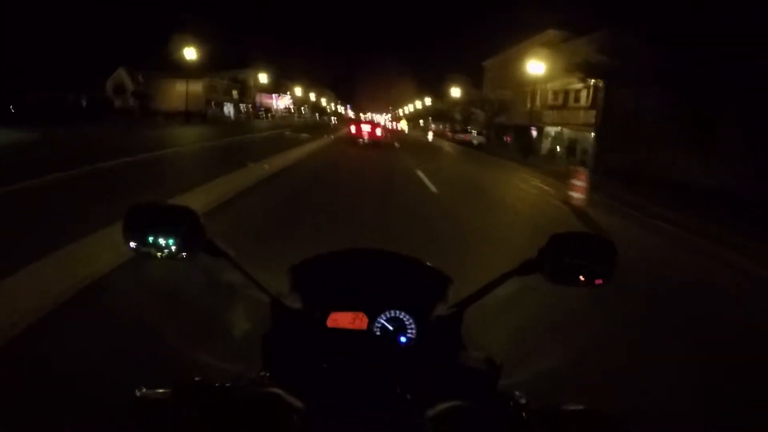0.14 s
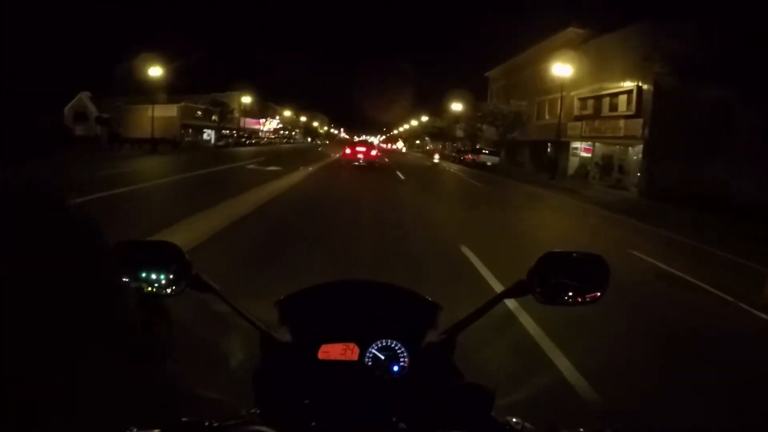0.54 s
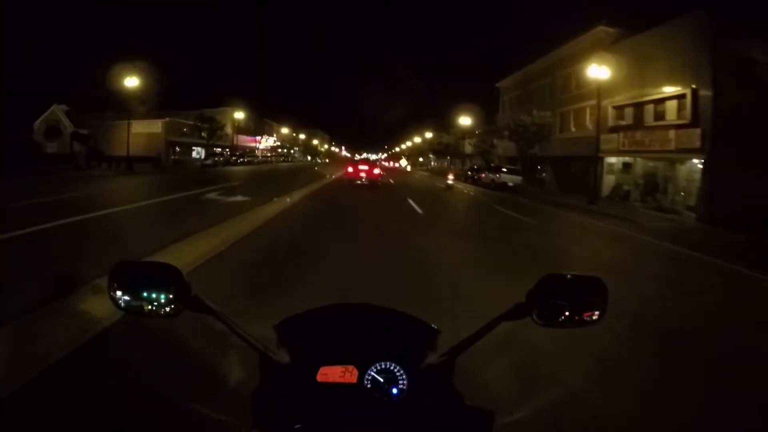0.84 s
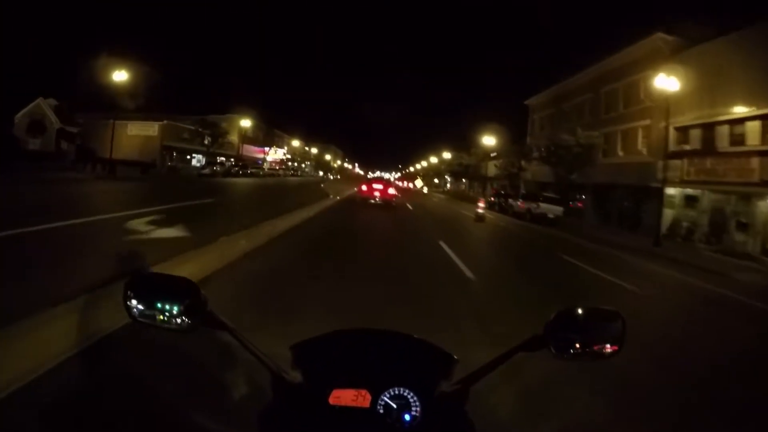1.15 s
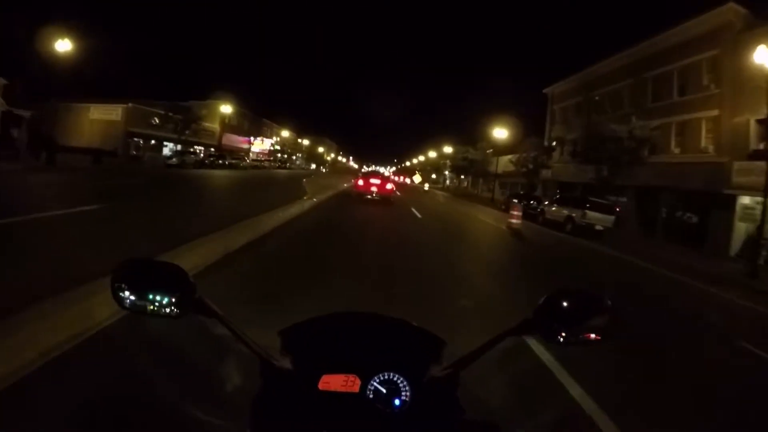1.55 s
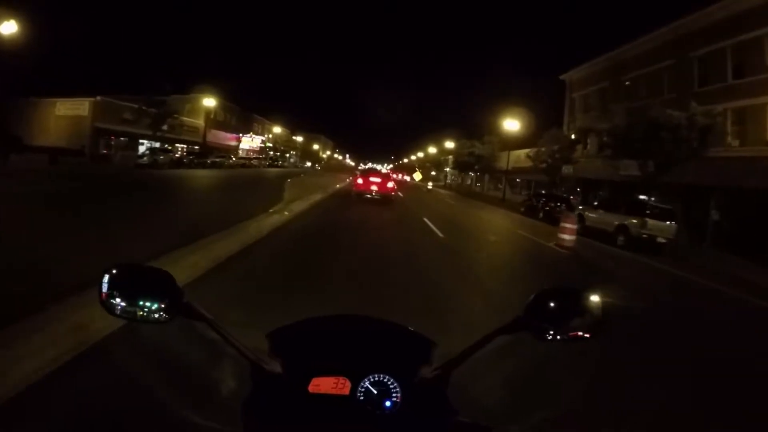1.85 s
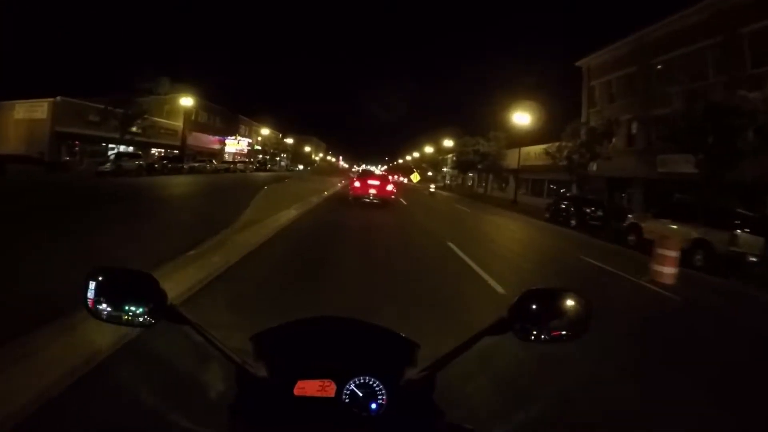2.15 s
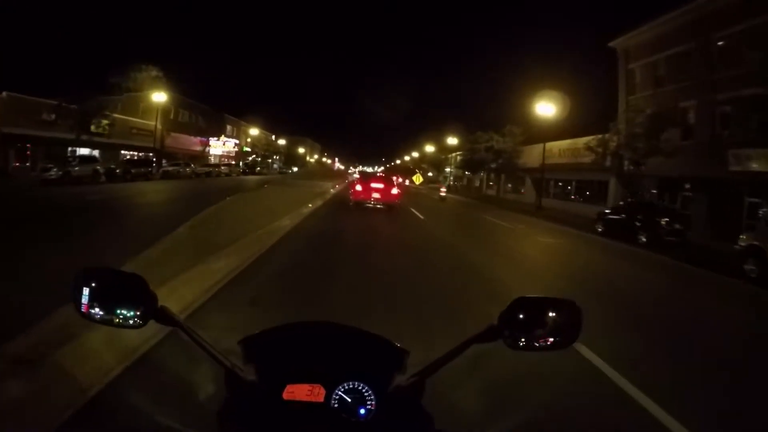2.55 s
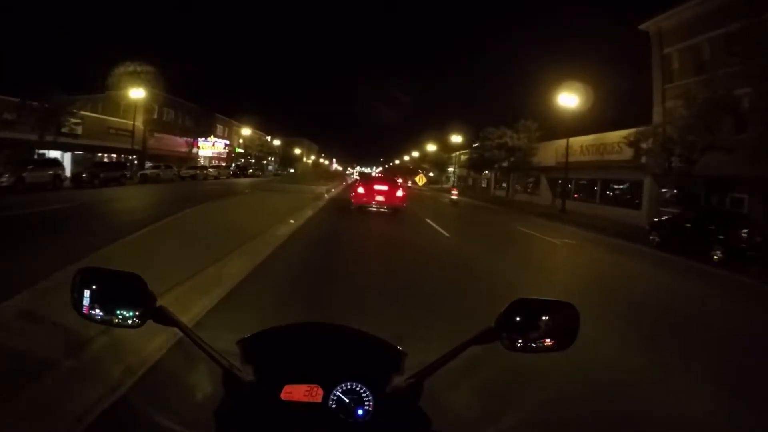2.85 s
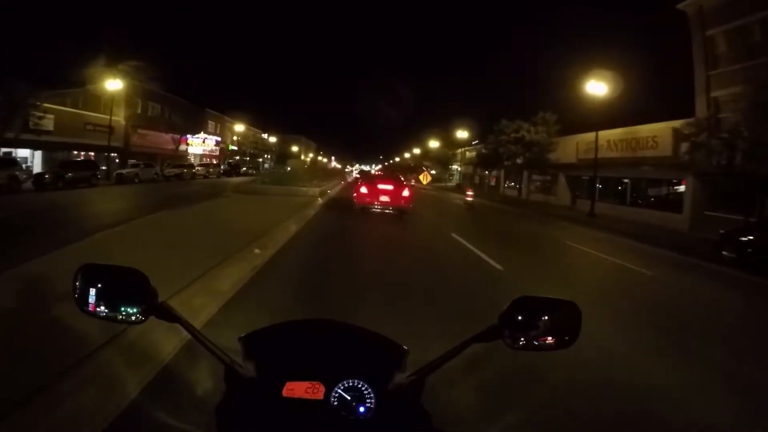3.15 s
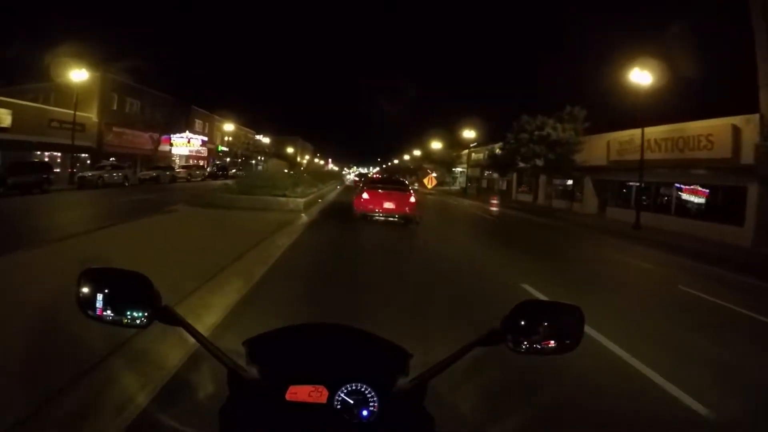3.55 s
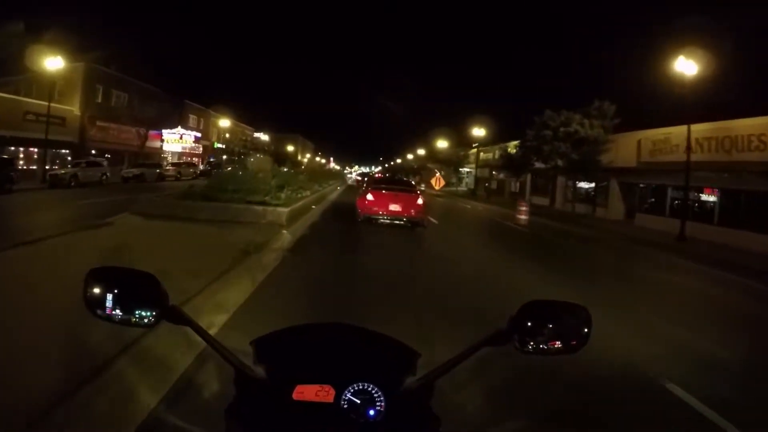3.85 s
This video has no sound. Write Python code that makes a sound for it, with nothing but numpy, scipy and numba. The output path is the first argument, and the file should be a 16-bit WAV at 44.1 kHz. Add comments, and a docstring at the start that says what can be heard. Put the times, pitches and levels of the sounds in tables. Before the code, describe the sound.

A motorcycle engine drones low beneath muffled wind and tyre roar, picked up close inside a camera case. At 0.05-0.35 s a hard bump booms and rattles the case; the level ducks, then gradually recovers. A faint hum passes around 0.6-1.6 s amid deep wobbling thumps and tiny hisses. The engine blips at 1.6 and 1.9 s, then sinks lower with a thin whine from 2.1-3.4 s; a soft thud lands at 3.54 s.

```python
"""A motorcycle rolls down a street at night, heard by a small camera in a closed case on the rider.
Wind and tyre roar pass muffled through the case, made from bands of noise, beside an engine of stacked tones.
At once a hard bump swings the mount and rattles the case; the gain control ducks and slowly comes back.
A hum swells up and fades, brief hisses come by, and the engine is blipped twice and then runs down.
A thin gear whine comes and goes over the slowing engine, and near the end one soft thud hits the case."""
import sys
import numpy as np
from scipy import signal
from scipy.io import wavfile
from numba import njit

SR = 44100
rng = np.random.default_rng(int(sys.argv[2]) if len(sys.argv) > 2 else 0)


def ratio(d):
    """dB to gain"""
    e = np.asarray(d, float) / 20
    return 10 ** e


def unload_audio(sound):
    """Save the sound as a 16-bit wav file, at the path given as the first command line argument."""
    columns = np.transpose(np.atleast_2d(sound))
    # keep every value between -1 and 1, then stretch to whole-number steps
    steps = np.round(np.clip(columns, -1, 1) * 32767)
    wavfile.write(sys.argv[1], SR, steps.astype(np.int16))


N = 176400
TIME_S = np.arange(N) / SR

# How the engine runs: time_s, firing_hz, level_db, throttle (0 closed, about 1 open)
ENGINE_RUN = [(0, 100.5, -24, 0.2), (.3, 98.43, -33, 1.02), (.71, 98.5, -34, 1), (1.2, 94.9, -24.5, 0.02),
              (1.5, 90.35, -22, 0), (1.54, 99.3, -17.5, 0.38), (1.61, 125.2, -15, 0.31),
              (1.65, 122.9, -24.5, 0), (1.82, 95.76, -19, 0.02), (1.86, 99.25, -19.5, 0.35),
              (1.94, 122.8, -19.5, 0.33), (1.97, 119.5, -18.5, 0.01), (2.12, 101.2, -19.5, 0),
              (2.29, 92.5, -16.5, 0.01), (2.38, 95.16, -19.5, 0), (2.44, 106.1, -18, 0),
              (2.6, 103.3, -17, 0.04), (2.78, 97.36, -17.5, 0.05), (3, 94.83, -17.5, 0.18),
              (3.42, 85.59, -18.5, 0.07), (3.71, 81.46, -18, 0), (4, 78.38, -15.5, 0.01)]
# Strength of each multiple of the firing rate: multiple, level_db
ENGINE_ORDERS = [(1, 0), (2, -14), (3, -19), (4, -28), (5, -35), (6, -41), (7, -46)]
# Swing of the mount, shaken by the road: time_s, pitch_hz, level_db
MOUNT_SHAKE = [(0, 44.5, -19.5), (.05, 40.9, -16.5), (.09, 43.8, -1.5), (.15, 43.4, 1), (.21, 43.03, 3),
               (.25, 42.93, 2), (.31, 47.2, -17), (.36, 45.1, -12.5), (.44, 48, -25.5), (.54, 50, -18.5),
               (.64, 47.5, -38), (.75, 46.16, -10.5), (.86, 46.67, -24), (.93, 47.2, -3.5),
               (.98, 46.67, -11.5), (1.04, 50.8, -1), (1.14, 46.3, -12), (1.34, 44, -12.5),
               (1.48, 45.21, -7), (1.59, 45.6, -4), (1.7, 45, -8.5), (1.77, 43.97, -18.5),
               (1.85, 47.56, -2), (1.97, 42.4, -4), (2.04, 45.2, -16), (2.13, 50.22, -2.5),
               (2.24, 47.78, -16.5), (2.3, 47.5, -9.5), (2.52, 46.9, -19), (2.68, 46.16, -9),
               (2.83, 48.62, -11.5), (3.04, 46.92, -12), (3.13, 46.33, -22), (3.25, 46.08, -12.5),
               (3.41, 46.09, -16), (3.56, 46.12, -25.5), (3.78, 48.3, -16.5), (4, 46.16, -28)]
# Ringing tones of the case: pitch_hz, level_db, t60_s (time to fall by 60 dB)
CASE_TONES = [(300, -2, .012), (520, 1, .018), (750, -5, .01), (1050, -4, .009), (1400, -8, .008),
              (1800, -10, .007), (2450, -10, .006), (3300, -12, .005), (4300, -14, .005), (5600, -18, .004)]
# Tone colour of the wind buffeting: pitch_hz, relative_level_db (per Hz)
WIND_COLOUR = [(14, -20.5), (24, -3), (40, -2.5), (65, -4), (100, -12), (150, -17), (230, -19.5),
               (330, -25.5), (500, -38.5), (800, -46.5)]
# Strength of the wind: time_s, level_db
WIND_STRENGTH = [(0, -13), (.1, -17), (.3, -28.5), (1, -18.5), (1.5, -17.5), (2.2, -17), (3, -19),
                 (4, -14.5)]
# Tone colour of tyre and air roar through the case: pitch_hz, relative_level_db (per Hz)
ROAR_COLOUR = [(290, -15.5), (500, -2.5), (714, -1.5), (962, 7.5), (1300, 2), (1600, -3.5), (1880, -6.5),
               (2100, -2), (2900, -1.5), (3500, -4), (4400, -8), (5700, -25), (7300, -37), (8500, -50.5),
               (10000, -45.5), (13000, -50), (15300, -63)]
# Resonances of the case in the roar: pitch_hz, width_hz, level_db (against the broad roar)
ROAR_RESONANCES = [(942, 90, -10), (1520, 60, -13), (2100, 90, -16), (2750, 120, -15), (5800, 200, -24),
                   (6550, 150, -30), (8470, 150, -33)]
# Strength of the roar with its resonances: time_s, level_db
ROAR_STRENGTH = [(0, -42.5), (2.5, -42), (3.3, -40.5), (4, -40)]
# Knocks on the case: start_s, peak_db, brightness_hz (low-pass), length_s (fade of the patter)
CASE_KNOCKS = [(0.058, -9.5, 3440, 0.015), (0.065, -7, 3540, 0.0045), (0.078, -2.5, 5940, 0.0036),
               (0.0905, -1, 1490, 0.0017), (0.113, -4, 5000, 0.0054), (0.131, -5, 1810, 0.0023),
               (0.144, -1, 5150, 0.0024), (0.168, -1.5, 6000, 0.0028), (0.185, -5.5, 1800, 0.002),
               (0.298, -8.5, 1690, 0.014), (0.315, -8, 2500, 0.0043), (0.952, -13, 1770, 0.00065)]
# The passing hum: time_s, pitch_hz, level_db
PASSING_HUM = [(.5, 216, -49.5), (.65, 222, -26.5), (1.2, 220, -30), (1.5, 210.9, -34.5), (1.7, 211, -43)]
# Brief swells of hiss: middle_s, level_db, length_s, low_hz, high_hz
HISS_SWELLS = [(0.977, -45, 0.031, 2020, 3460), (1.418, -42, 0.034, 1990, 3740),
               (1.855, -48, 0.016, 3446, 6770), (2.163, -45, 0.035, 2022, 3360),
               (3.055, -38.5, .045, 1208, 3400)]
# Strength of the gear whine: time_s, level_db
WHINE_STRENGTH = [(2.1, -71.5), (2.28, -61.5), (2.47, -58), (2.68, -67), (2.85, -56.5), (3.08, -59.5),
                  (3.4, -67.5)]


def in_time(rows):
    """Join the table's values by straight lines in time, one curve for each column."""
    s, *columns = np.transpose(rows)
    return [np.interp(TIME_S, s, c) for c in columns]


def rms_one(x):
    """Scale to an rms (average strength) of 1."""
    return x / np.sqrt(np.mean(x ** 2) + 1e-20)


def drift(rate_hz):
    """Smoothed noise of rms 1 that wanders up and down; a higher rate wanders faster."""
    # Worked out at every 40th sample, after a run-in of 2000 values
    r = np.exp(-80 * np.pi * rate_hz / SR)
    white = rng.standard_normal(N // 40 + 2002)
    slow = signal.lfilter([1], [1, -2 * r, r * r], white)[2000:]
    return np.interp(np.arange(N) / 40, np.arange(len(slow)), rms_one(slow))


def cut(x, hz, kind):
    """Second-order Butterworth filter: keep the low, high or middle part of a sound."""
    sos = signal.butter(2, np.clip(hz, 10, .45 * SR), kind, fs=SR, output="sos")
    return signal.sosfilt(sos, x)


def sine(hz):
    """A sine of rms 1 that follows a changing pitch."""
    return np.sqrt(2) * np.sin(2 * np.pi * np.cumsum(hz) / SR)


def banded_noise(colour, patchy_db, rate_hz):
    """Noise in third-octave bands that flicker partly together, partly alone; rms 1."""
    hz, db = np.transpose(colour)
    edges = np.geomspace(hz[0], hz[-1], int(3 * np.log2(hz[-1] / hz[0])) + 2)
    out, together, white = 0, drift(rate_hz), rng.standard_normal((2, N))
    for k, (low, high) in enumerate(zip(edges, edges[1:])):
        level_db = np.interp(np.log(low * high) / 2, np.log(hz), db)
        flicker_db = patchy_db * (0.6 * together + drift(rate_hz))
        # Neighbouring bands take turns with two separate noises
        out = out + ratio(level_db + flicker_db) * cut(white[k % 2], [low, high], "band")
    return rms_one(out)


def engine():
    """Tones at whole and half multiples of the firing rate; an open throttle lifts the upper ones."""
    throttle_tilt_db, half_orders_db, flicker_db = 8, -15, 1.3  # tilt is per octave at full throttle
    pipe_hz, pipe_width_hz, pipe_db = 395, 34, 8  # resonance woken by the throttle
    boom_hz, boom_width_hz, boom_db = 189.4, 26.4, 6  # the exhaust booms near one pitch
    firing_hz, level_db, throttle = in_time(ENGINE_RUN)
    uneven_hz = firing_hz * (1 + .005 * drift(25))
    phase = 2 * np.pi * np.cumsum(uneven_hz) / SR
    out = 0
    for k, order_db in ENGINE_ORDERS:
        tilt_db = throttle_tilt_db * throttle * np.log2(k)
        pipe_lift_db = pipe_db * throttle * np.exp(-((k * firing_hz - pipe_hz) / pipe_width_hz) ** 2)
        boom_lift_db = boom_db * np.exp(-((k * firing_hz - boom_hz) / boom_width_hz) ** 2)
        tone_db = order_db + tilt_db + pipe_lift_db + boom_lift_db
        out = out + ratio(tone_db + flicker_db * drift(20.0)) * np.cos(k * phase - 0.32 * k)
        half_db = tone_db + half_orders_db + flicker_db * drift(13.0)
        out = out + ratio(half_db) * np.cos((k + .5) * phase)
    return np.sqrt(2) * ratio(level_db) * out


def wind():
    """Low air buffeting, made lumpy by slowly flickering bands of noise."""
    level_db, = in_time(WIND_STRENGTH)
    return ratio(level_db) * banded_noise(WIND_COLOUR, patchy_db=-1.0, rate_hz=5.4)


def roar(white):
    """Broad tyre and air noise; white noise through narrow resonances of the case is added."""
    out = banded_noise(ROAR_COLOUR, patchy_db=1.37, rate_hz=42)
    for hz, width_hz, db in ROAR_RESONANCES:
        r = np.exp(-np.pi * width_hz / SR)
        resonator = [1, -2 * r * np.cos(2 * np.pi * hz / SR), r * r]
        out = out + ratio(db) * rms_one(signal.lfilter([1, 0, -1], resonator, white))
    level_db, = in_time(ROAR_STRENGTH)
    return ratio(level_db) * out


def case_ring(t, spread_db):
    """The case's answer to one click: fading tones, each with a slightly random level."""
    out = 0
    for hz, db, t60 in CASE_TONES:
        level = ratio(db + spread_db * rng.standard_normal())
        out = out + level * ratio(-60 * t / t60) * np.sin(2 * np.pi * hz * t)
    return out


def mount_swing(phase, size):
    """The springy mount swings near its own pitch, with a weak tone an octave above."""
    return size * (np.sin(phase) + ratio(-24) * np.cos(2 * phase))


def case_buzz(swing):
    """The case buzzes at each swing: high noise that grows with the push, fading from the start."""
    hiss = cut(rng.standard_normal(N), 2500, "high")
    settle = np.exp(-(TIME_S / 0.63) ** 2)
    return ratio(-40) * np.abs(swing) ** 1.3 * hiss * settle


def case_rattle(size):
    """Loose parts patter on the case and make it ring; louder in hard shaking, fading from the start."""
    clicks_per_s, settle_s = 2700, 0.13
    patter = (rng.random(N) < clicks_per_s / SR) * rng.standard_normal(N)
    ring = case_ring(np.arange(SR // 20) / SR, spread_db=-1.0)
    rattle = cut(rms_one(signal.fftconvolve(patter, ring)[:N]), 3700, "low")
    return ratio(-16.5) * size ** 1.3 * rattle * np.exp(-TIME_S / settle_s)


def mount():
    """One shake drives the mount's swing and, with it, the buzz and rattle of the case."""
    hz, level_db = in_time(MOUNT_SHAKE)
    phase = 2 * np.pi * np.cumsum(hz * (1 + 0.075 * drift(4.77))) / SR
    size = np.sqrt(2) * ratio(level_db)
    swing = mount_swing(phase, size)
    return swing + case_buzz(swing) + case_rattle(size)


def knocks():
    """Each knock is a click and a short patter, dulled by the contact, ringing in the case."""
    clicks_per_s = 3000.0
    t, out = np.arange(int(.15 * SR)) / SR, np.zeros(N + SR)
    for start_s, peak_db, bright_hz, length_s in CASE_KNOCKS:
        hits = rng.random(len(t)) < clicks_per_s / SR
        patter = hits * rng.standard_normal(len(t)) * np.exp(-t / length_s)
        patter[0] = 1  # the first click
        ringing = signal.fftconvolve(patter, case_ring(t, spread_db=2.5))[:len(t)]
        dulled = cut(cut(ringing, bright_hz, "low"), bright_hz, "low")
        first = int(start_s * SR)
        out[first:first + len(t)] += ratio(peak_db) * dulled / np.abs(dulled).max()
    return out[:N]


def hum():
    """A passing tone, wavering in pitch and level, that comes and goes."""
    hz, level_db = in_time(PASSING_HUM)
    return ratio(level_db + 2.0 * drift(19.0)) * sine(hz * (1 + 0.021 * drift(7.3)))


def hiss_swells(white):
    """Short bell-shaped swells of white noise, each kept to its own band."""
    out = 0
    for middle_s, db, length_s, *band_hz in HISS_SWELLS:
        hiss = rms_one(cut(cut(white, band_hz, "band"), band_hz, "band"))
        out = out + ratio(db) * np.exp(-(2 * (TIME_S - middle_s) / length_s) ** 2) * hiss
    return out


def whine():
    """A thin wavering gear tone that rides on the engine speed, at 44 times the firing rate."""
    hz = 44.0 * in_time(ENGINE_RUN)[0] * (1 + .0045 * drift(20.5))
    level_db, = in_time(WHINE_STRENGTH)
    return ratio(level_db + 3.0 * drift(20)) * sine(hz)


def thud():
    """One soft, dead push on the case, so damped that it swings only once and a half."""
    middle_s, peak_db, pitch_hz, length_s = 3.5389, -9.5, 500, 0.00067
    t = TIME_S - middle_s
    return ratio(peak_db) * np.exp(-(t / length_s) ** 2) * np.cos(2 * np.pi * pitch_hz * t)


def scene():
    """Everything reaches one microphone."""
    machine = engine() + whine() + hum()
    case = mount() + knocks() + thud()
    white = rng.standard_normal(N)
    air = roar(white) + hiss_swells(white[::-1]) + wind()  # the swells use the noise backwards
    return (machine + case + air)[None]


@njit
def gain_control(x, smooth, trigger, fall, rise, hold):
    """Gain steps down while the output is too loud, waits, then creeps back."""
    out, gain, power, wait = np.empty_like(x), 1.0, 0.0, 0.0
    for i in range(len(x)):
        out[i] = gain * x[i]
        power += smooth * (min(out[i] ** 2, 1.0) - power)
        if power > trigger:
            gain, wait = gain * fall, hold
        elif wait > 0:
            wait -= 1
        else:
            gain = min(gain * rise, 1.0)
    return out


def overload(x, ceiling):
    """Loud peaks are squashed softly so that they stay below the ceiling."""
    return x / (1 + (x / ceiling) ** 6) ** (1 / 6)


def top_cut(x):
    """Nothing passes above the cut-off."""
    return signal.sosfilt(signal.butter(12, 15150, fs=SR, output="sos"), x)


def record(dry):
    """The camera turns loud sound down, then squashes the peaks that are left."""
    sense_s, trigger_db, hold_s = 0.053, -10.5, 0.63
    fall_db_per_s, rise_db_per_s = 115, 8
    levelled = gain_control(dry[0], 1 / (sense_s * SR), float(ratio(2 * trigger_db)),
                            float(ratio(-fall_db_per_s / SR)), float(ratio(rise_db_per_s / SR)), hold_s * SR)
    mix = overload(levelled, ceiling=0.91)[None]
    return top_cut(mix)


dry = scene()
out = record(dry)
unload_audio(out)
```